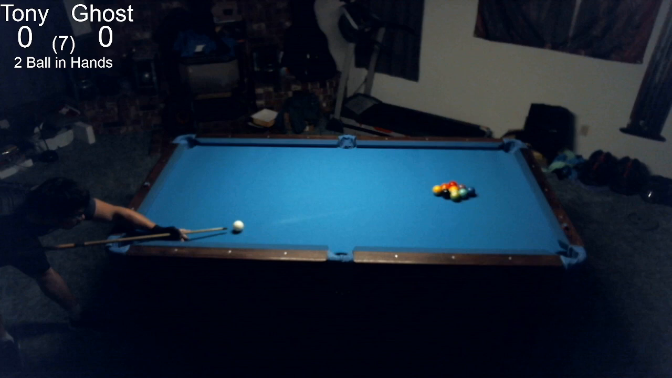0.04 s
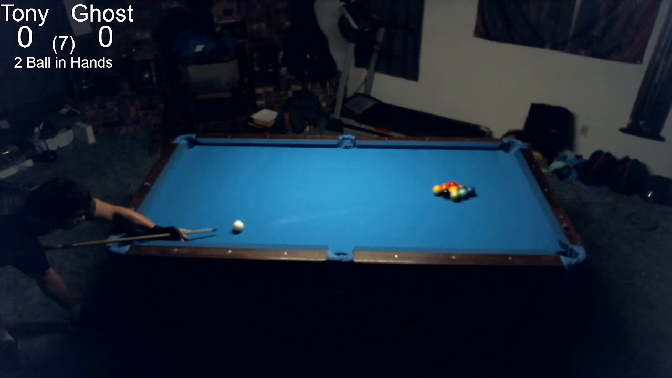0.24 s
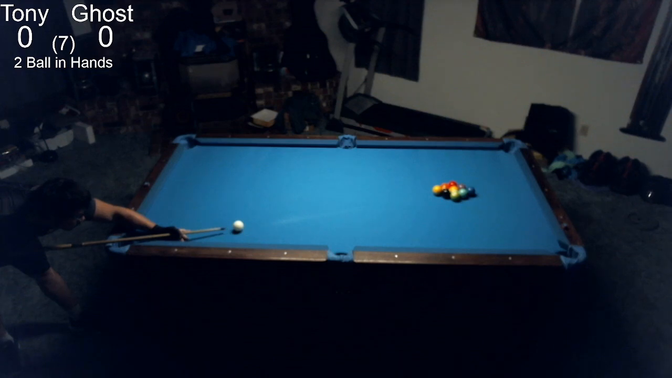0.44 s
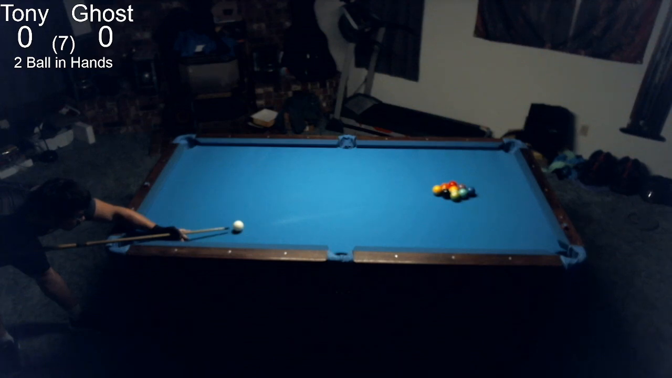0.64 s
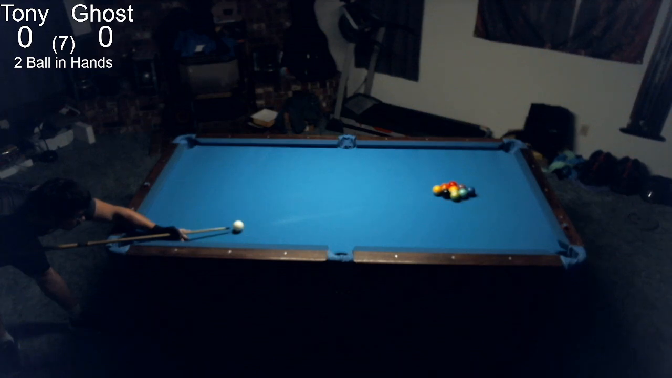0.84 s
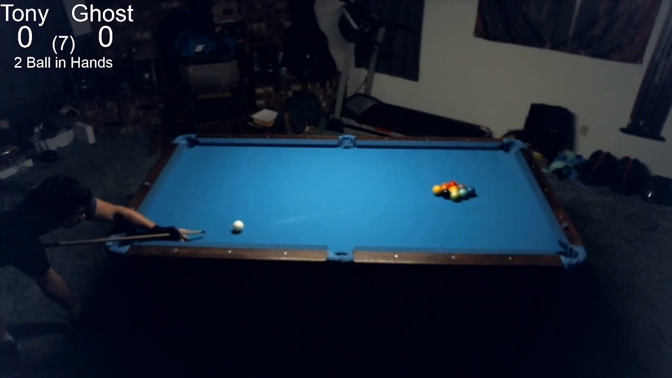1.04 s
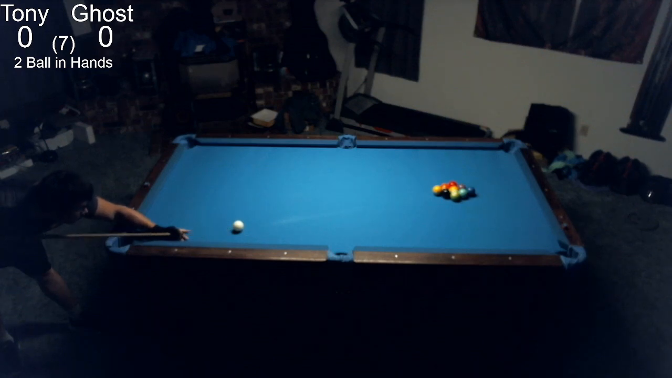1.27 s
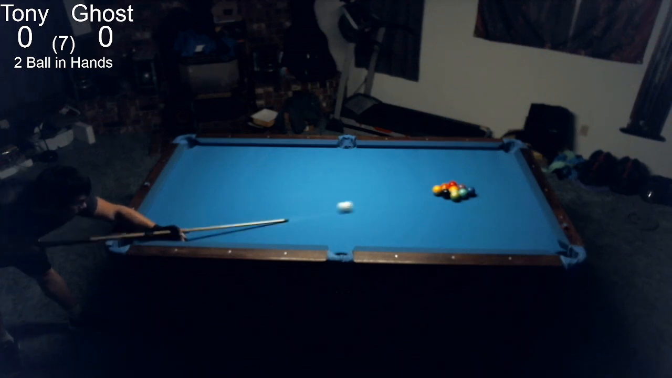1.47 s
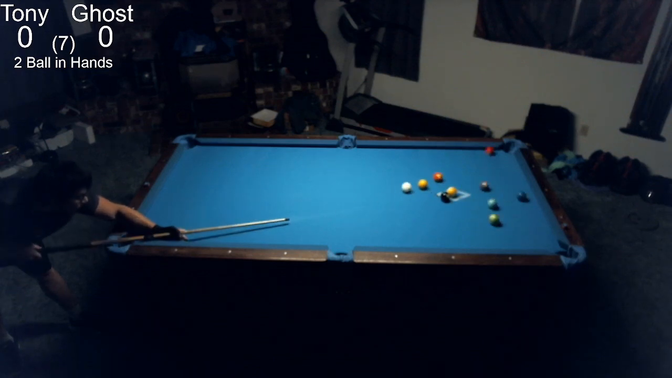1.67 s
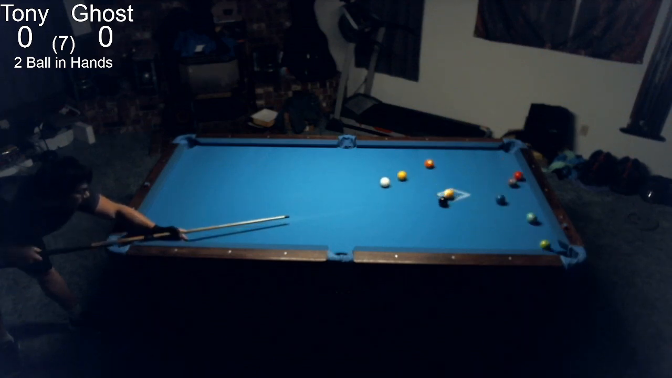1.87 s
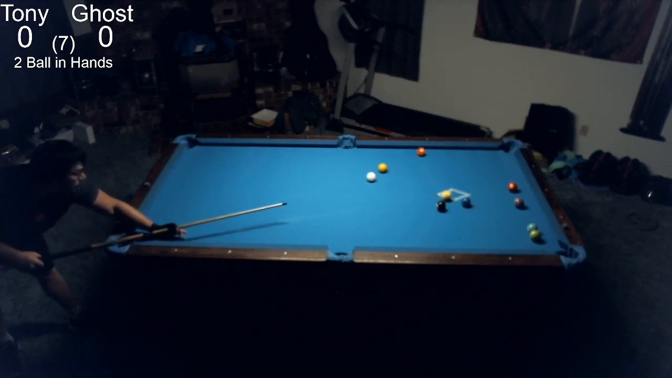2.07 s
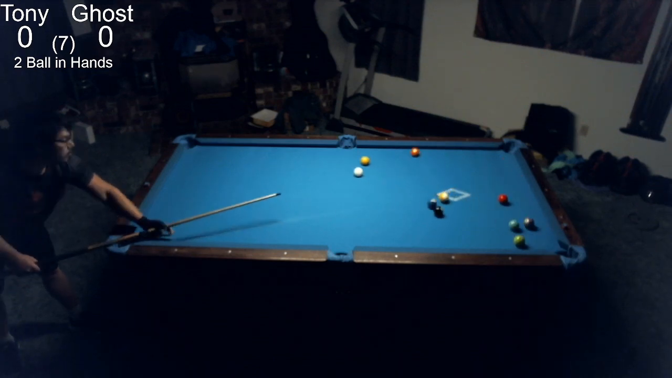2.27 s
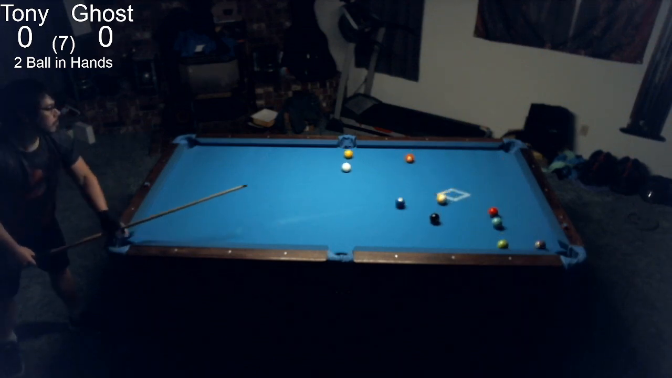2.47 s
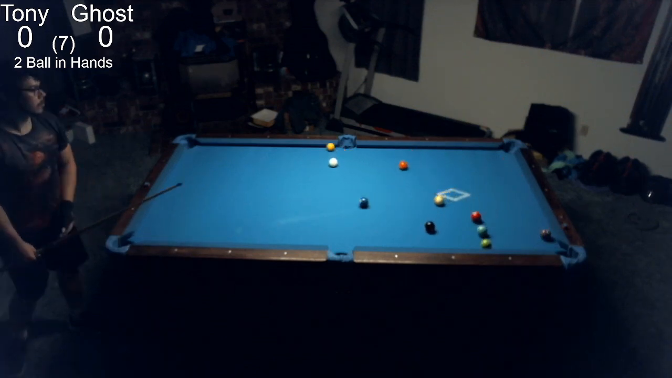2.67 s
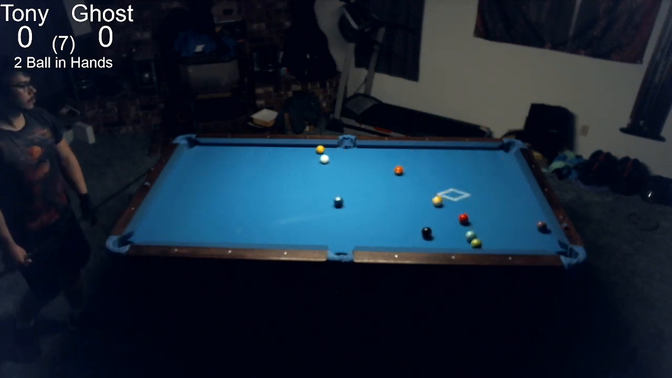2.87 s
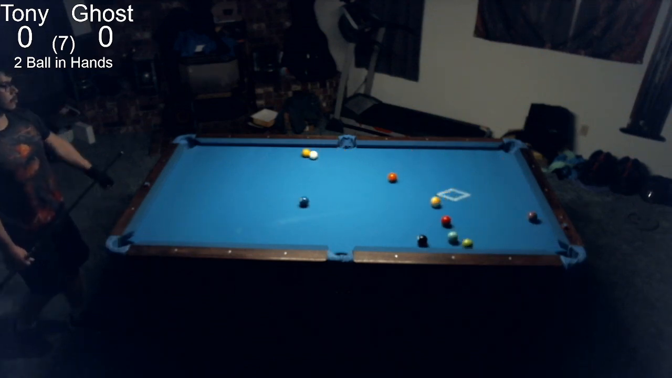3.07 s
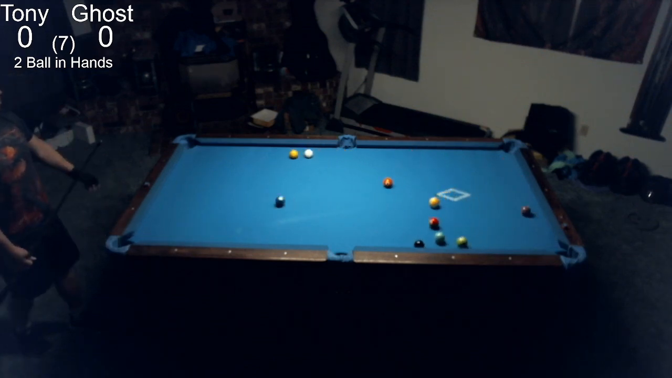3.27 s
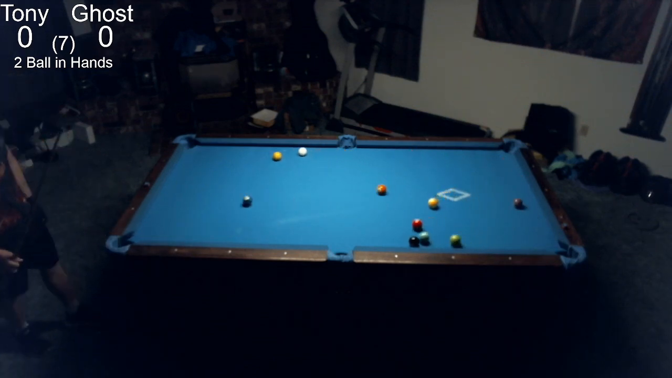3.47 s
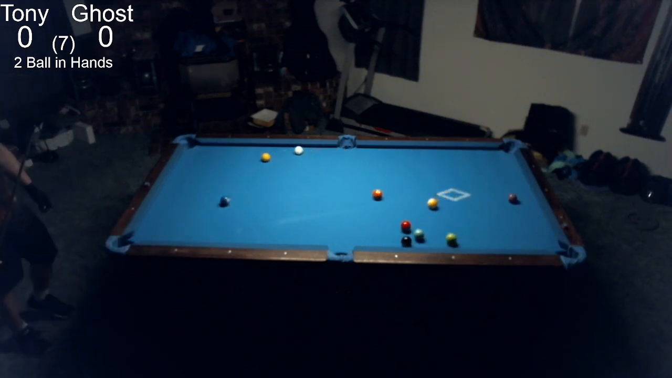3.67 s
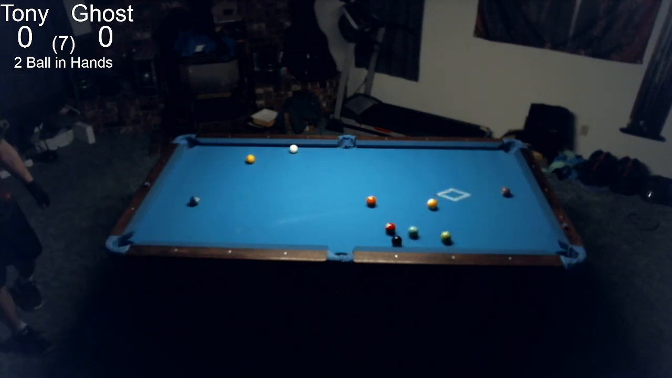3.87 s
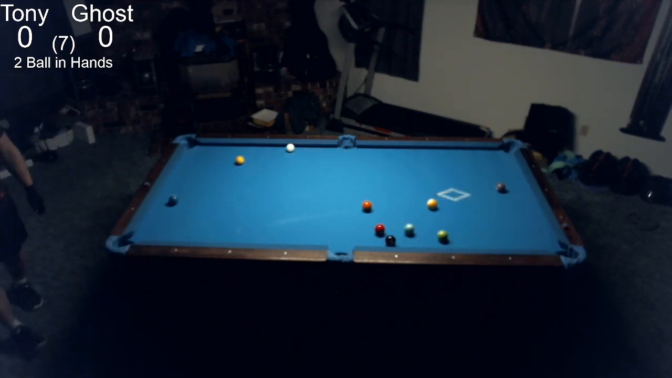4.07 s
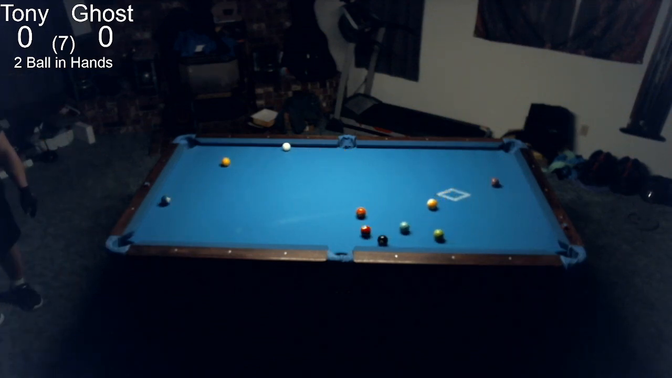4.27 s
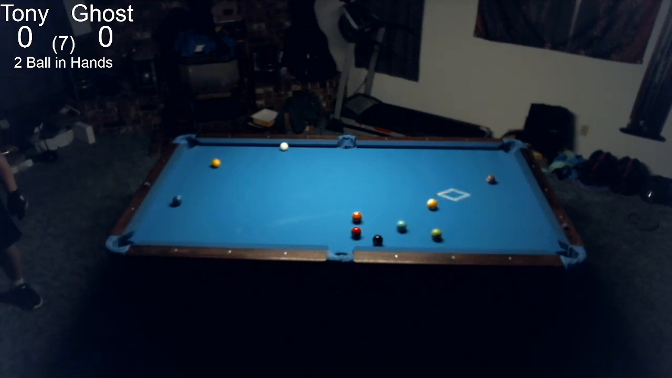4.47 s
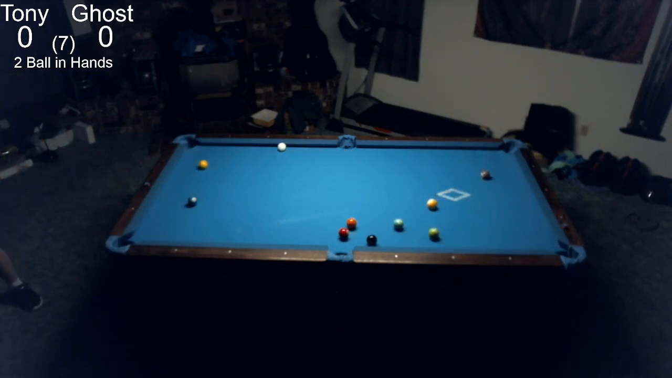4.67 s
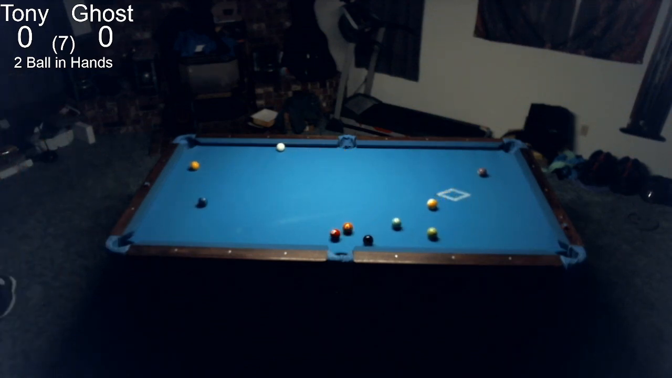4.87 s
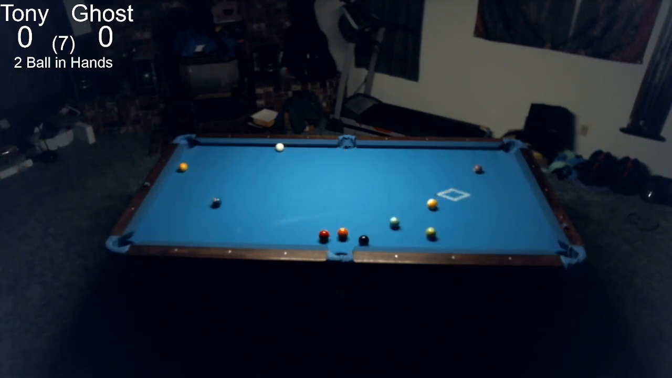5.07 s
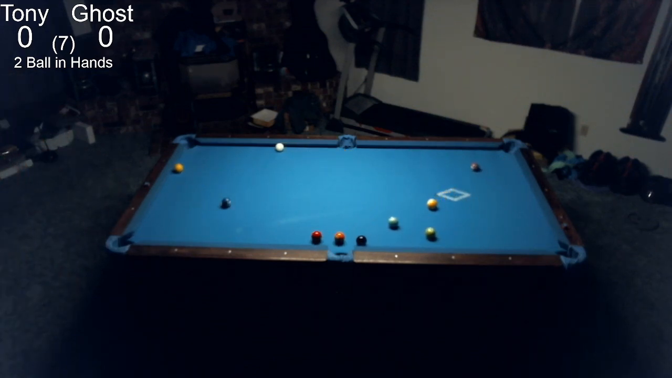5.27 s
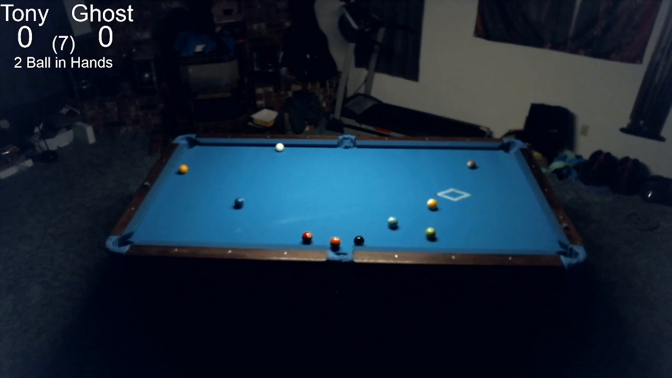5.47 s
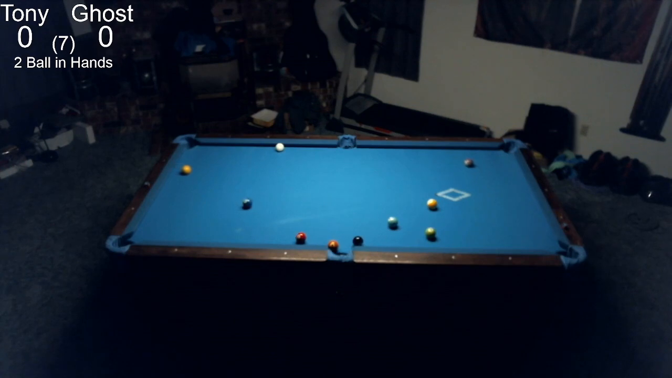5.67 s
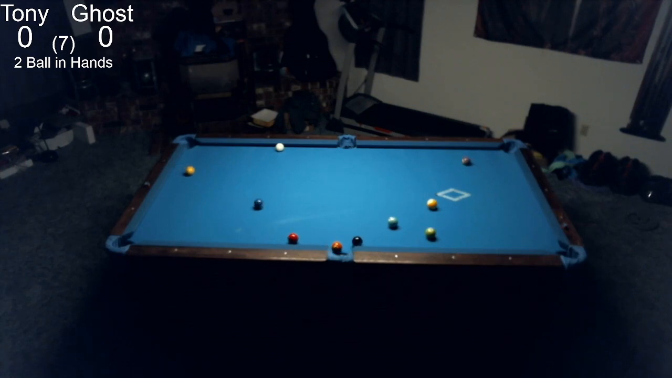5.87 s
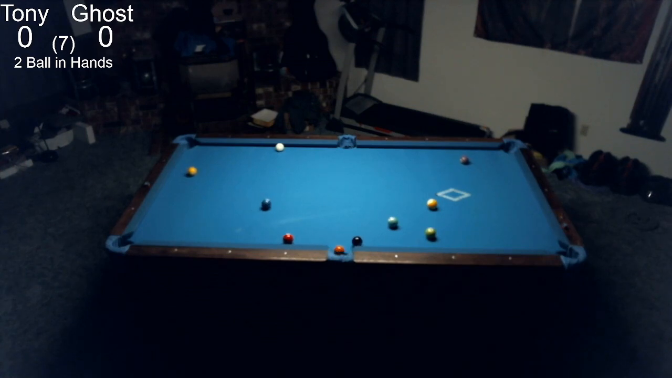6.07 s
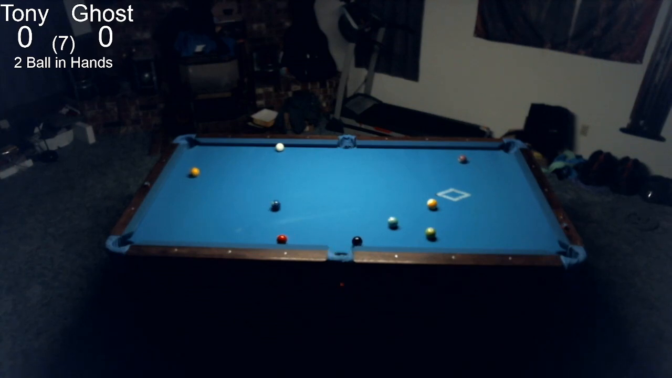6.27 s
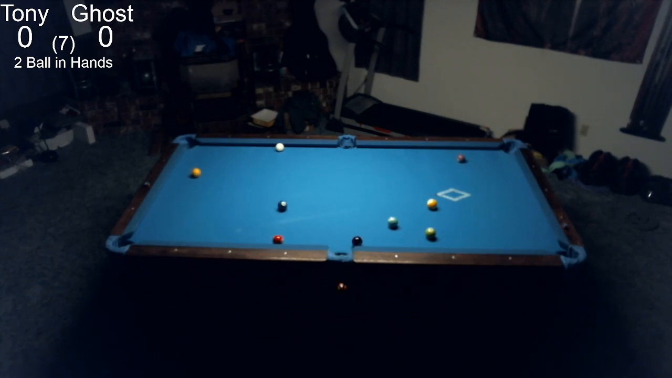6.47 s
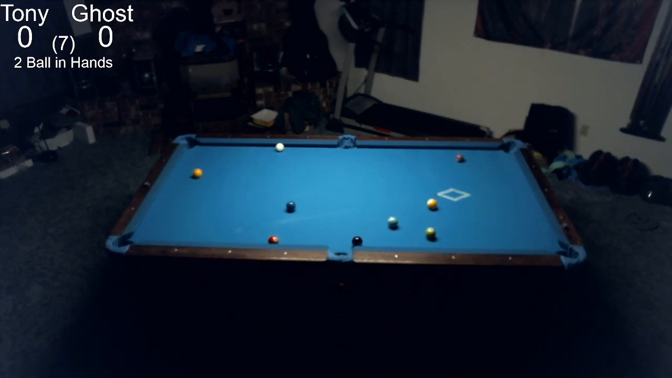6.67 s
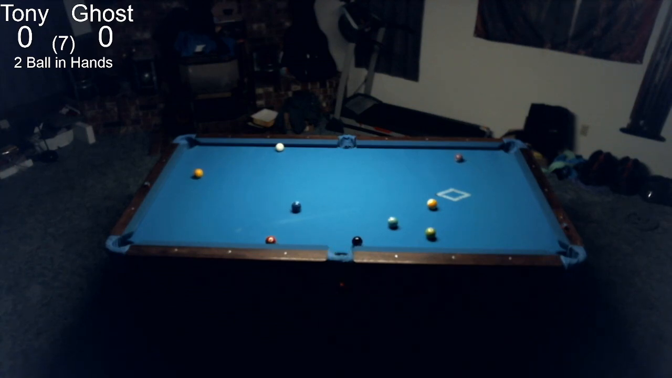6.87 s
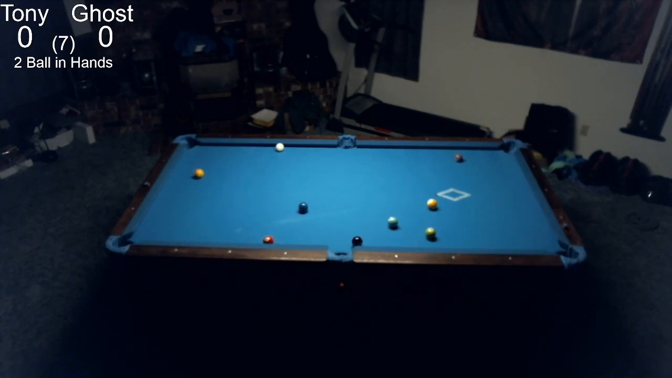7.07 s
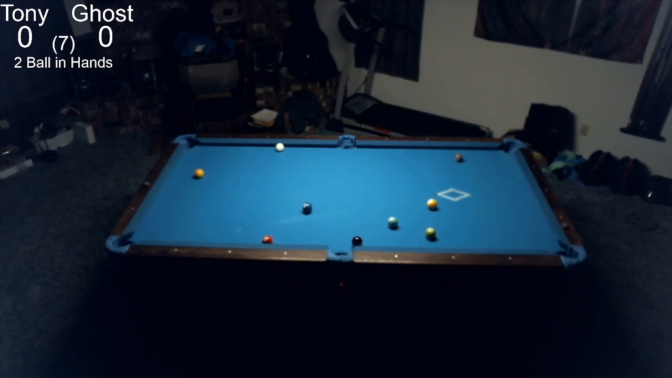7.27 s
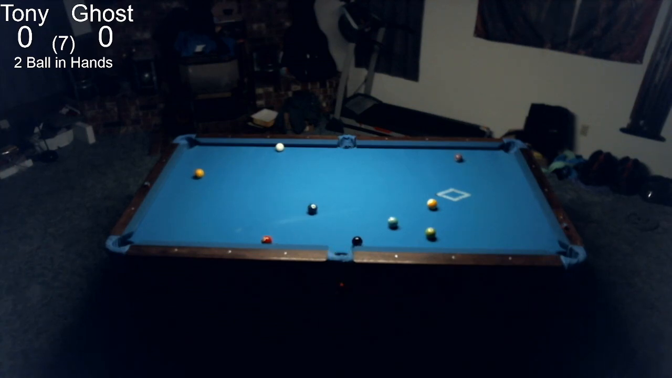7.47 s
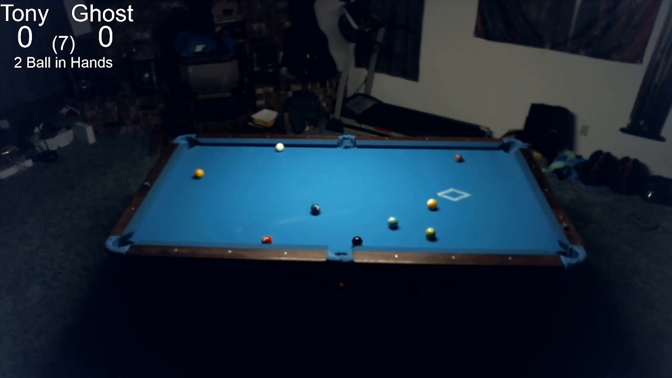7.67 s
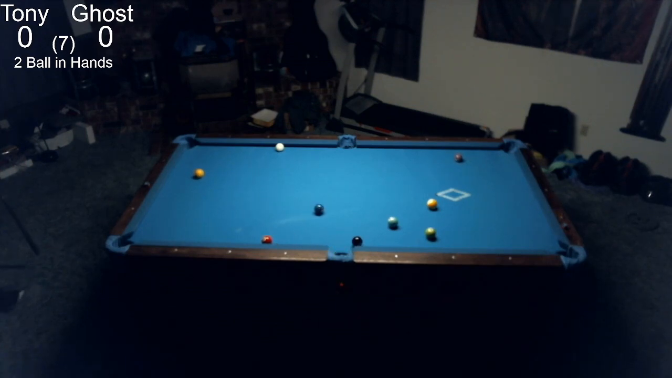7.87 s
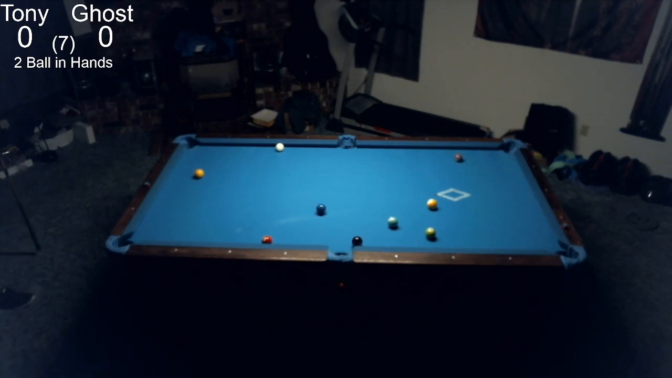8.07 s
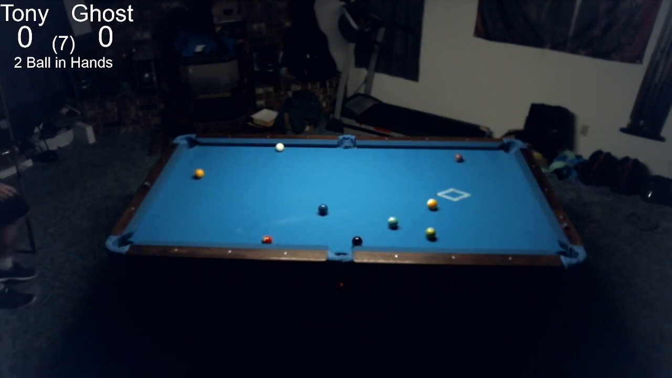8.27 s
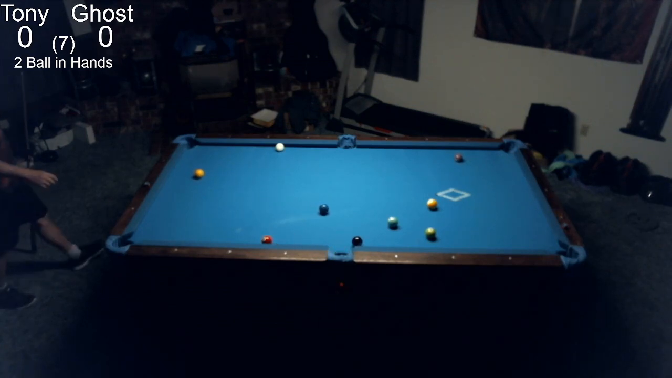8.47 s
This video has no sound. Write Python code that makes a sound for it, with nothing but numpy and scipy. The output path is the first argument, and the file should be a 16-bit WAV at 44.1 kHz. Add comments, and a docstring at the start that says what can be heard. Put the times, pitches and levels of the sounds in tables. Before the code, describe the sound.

A hard cue crack and explosive pool break overload the microphone, then ball clicks fade, with light taps and a pocketed ball knocking through the return.

```python
"""A small, quiet game room with a pool table: a nine-ball break, heard from beside the table.
The cue cracks and rings, the rack bursts in a buzzing crack that overloads the microphone and echoes off a wall,
and the balls thump the cushions and click, mostly softer as they go. Later come light taps, mostly the cue put away,
while a ball rolls onto a side pocket's lip and knocks down the return. Mains hum and a faint hiss lie under it all.
Blows are short bursts of filtered noise, force pulses or decaying tones, each given the echoes of the room."""
import sys
import numpy as np
from scipy import signal
from scipy.fft import rfft, irfft
from scipy.io import wavfile
from scipy.ndimage import uniform_filter1d, minimum_filter1d

SR = 44100
rng = np.random.default_rng(int(sys.argv[2]) if len(sys.argv) > 2 else 0)


def materialize(psi):
    """Save the field psi as 16-bit PCM at rate SR to the path in sys.argv[1].

    A 1-D psi becomes a single channel; in a 2-D psi each row is a channel.
    """
    bounded = np.clip(np.atleast_2d(psi).T, -1, 1)
    quanta = np.round(bounded * 32767).astype(np.int16)
    wavfile.write(sys.argv[1], SR, quanta)


N = 375732  # samples in the whole scene
LENGTH = 32768  # samples in one blow with its echoes
T = np.arange(LENGTH) / SR  # time within a blow, s
HZ = np.fft.rfftfreq(LENGTH, 1 / SR)


def amp(db):
    """Turns decibels into a gain."""
    return 10 ** (np.asarray(db) / 20)


def unit(x):
    """Scales a sound to energy 1."""
    return x / np.sqrt(np.sum(x ** 2) + 1e-20)


def read_curve(points, hz):
    """Joins (frequency, value) points by straight lines on a log-frequency axis."""
    point_hz, value = np.transpose(points)
    return np.interp(np.log(hz + 1), np.log(point_hz + 1), value)


def add(mix, start_s, sound):
    """Mixes a sound in at its start time, cut off at the end of the mix."""
    part = mix[round(start_s * SR):][:len(sound)]
    part += sound[:len(part)]


def colour(x, gain_db):
    """Filters with the given gain at each frequency, without sounding before the blow."""
    both_sides_db = np.r_[gain_db, gain_db[-2:0:-1]]
    log_gain = np.log(amp(both_sides_db))
    # the Hilbert transform gives the phase that makes the filter start at once (minimum phase)
    response = np.exp(np.conj(signal.hilbert(log_gain)))[:len(HZ)]
    return irfft(rfft(x) * response)


def echo(x, delay_ms):
    """Plays the same sound later."""
    return np.interp(T - delay_ms / 1000, T, x, left=0)


def decay(t60):
    """Dies away by 60 dB in t60 seconds."""
    return amp(-60 * T / t60)


def ring(modes):
    """A struck body sounds as a sum of dying tones, one for each way it can vibrate."""
    total = 0
    for pitch_hz, level_db, t60_s in modes:
        tone = decay(t60_s) * np.cos(2 * np.pi * pitch_hz * T)
        total = total + amp(level_db) * unit(tone)
    return total


def rattle(t60, snap):
    """One sharp contact, then dying chatter; snap is the contact's size against the chatter."""
    chatter = unit(rng.standard_normal(LENGTH) * decay(t60))
    chatter[0] += snap
    return unit(chatter)


# First echoes off the walls: delay_ms, level_db
WALL_ECHOES = [(11.6, -13), (14.2, -14), (16.2, -11.5), (20.2, -9.5)]
# How long the room rings at each pitch: frequency_hz, t60_s
ROOM_DECAY = [(120, 0.28), (400, 0.67), (900, 0.4403), (1500, 0.34), (2500, 0.3), (4500, .32), (7000, 0.27)]


def room(x, room_db, walls_db=-2, build_s=.012, early=0.98):
    """Direct sound, first wall echoes and a diffuse tail whose decay time depends on frequency."""
    hz, t, noise = signal.stft(rng.standard_normal(LENGTH), SR, nperseg=256)
    t60 = read_curve(ROOM_DECAY, hz)[:, None]
    tail = signal.istft(noise * amp(-60 * t / t60), SR, nperseg=256)[1][:LENGTH]
    tail = unit(tail * np.where(T < build_s, early, 1))  # early is the gain until build_s
    wet = unit(signal.fftconvolve(x, tail)[:LENGTH])
    for delay_ms, level_db in WALL_ECHOES:
        wet = wet + amp(level_db + walls_db) * echo(unit(x), delay_ms)
    return x + amp(room_db) * np.linalg.norm(x) * unit(wet)


# Mains hum, one row for each steady tone: pitch_hz, level_db (rms)
HUM_TONES = [(59.95, -69), (119.9, -91), (307, -94), (419.7, -94), (539.6, -92.5), (659.5, -93)]
# Tone colour of the hiss: frequency_hz, level_db (per Hz, relative)
HISS_COLOUR = [(20, -13.5), (100, -10.5), (160, -3.5), (290, -1), (500, -7), (790, -5), (1300, -8.5),
               (2000, -11), (3200, -13.5), (5200, -12.5), (6300, -16), (7000, -24), (7600, -29)]


def background(hiss_db=-81.5):
    """Mains hum is a few steady sine tones; the room's faint hiss is steady filtered noise."""
    t = np.arange(N) / SR
    hum = np.zeros(N)
    for pitch_hz, level_db in HUM_TONES:
        hum += amp(level_db) * np.sqrt(2) * np.sin(2 * np.pi * (pitch_hz * t + rng.random()))
    gain = amp(read_curve(HISS_COLOUR, np.fft.rfftfreq(N, 1 / SR)))
    hiss = irfft(rfft(rng.standard_normal(N)) * gain, N)
    return hum + amp(hiss_db) * hiss / hiss.std()


# The cue's blow, a few contacts in quick succession: start_s, level_db (energy)
STROKE_CONTACTS = [(1.4130, 3.5), (1.4145, 3.5), (1.4181, 5.5)]
# Tone colour of the crack: frequency_hz, gain_db
CRACK_COLOUR = [(50, -55), (130, -33), (220, -12), (450, -5.5), (1100, -1.5), (1500, -3), (2000, -6.5),
                (2500, 2), (3900, 2), (5200, 0.5), (6200, -9), (7000, -13.5), (7500, -27)]
# The ringing cue: pitch_hz, level_db (energy), t60_s
SHAFT_MODES = [(1718.3, -4, 0.1399), (2600, -11.5, 0.08059), (2829, -8.5, 0.3), (2920, -1, 0.27),
               (3814, -14.5, .15), (4310, -11.5, .12), (4510, -3.5, .26), (4480, -7.5, 0.25),
               (4604, -9, .27), (5474, -13, .26), (5530, -9, .32), (5737, -10.5, .24)]


def cue_stroke(crack_t60=.018, snap=.15, room_db=-2.5, ring_db=3.0, ring_room_db=-1, ring_rise_s=0.0014):
    """The hard tip cracks on the cue ball and sets the shaft ringing."""
    out = np.zeros(N)
    for start_s, level_db in STROKE_CONTACTS:
        crack = unit(colour(rattle(crack_t60, snap), read_curve(CRACK_COLOUR, HZ)))
        add(out, start_s, amp(level_db) * room(crack, room_db))
    shaft = ring(SHAFT_MODES) * (1 - np.exp(-T / ring_rise_s))
    add(out, STROKE_CONTACTS[0][0], amp(ring_db) * room(shaft, ring_room_db, walls_db=-15.5))
    return out


# Dull blows of balls on slate, cushions and pocket: start_s, level_db (energy), pitch_hz
THUMP_BLOWS = [(1.498, -19.5, 469.7), (1.597, -22.5, 210), (1.6728, -12, 439), (1.702, -24, 229),
               (1.734, -24.5, 128), (1.745, -23.5, 285), (1.846, -42, 256), (1.9, -32, 193),
               (6.095, -32, 310), (6.318, -37.5, 225)]


def thumps(t60=.034, room_db=-2, rise_s=0.00069, count=3, rebound_s=.023, rebound_db=-9.5, rebound_pitch=0.75):
    """Soft blows make the table's body sound briefly; each rebound is later, weaker and lower."""
    out = np.zeros(N)
    for start_s, level_db, pitch_hz in THUMP_BLOWS:
        for k in range(count):
            tone = ring([(pitch_hz * rebound_pitch ** k, 0, t60)])
            blow = unit(tone * (1 - np.exp(-T / rise_s)))
            add(out, start_s + k * rebound_s, amp(level_db + k * rebound_db) * room(blow, room_db))
    return out


# Tone colour of a ball struck by a ball: frequency_hz, gain_db
CLICK_COLOUR = [(60, -41), (200, -30.5), (550, -23.5), (800, -9), (1100, -1.5), (1700, 3), (2500, 6),
                (3300, -2), (4000, -10), (4600, -14.5), (5600, -15.5), (6500, -23), (7500, -34)]


def contact(strength_db, touch_ms=.305, law=.165):
    """Two balls squeeze and part, radiating the change of force; softer hits touch longer and sound duller."""
    # touch_ms is for a 0 dB collision; it shrinks as strength to the power law
    ms = touch_ms * amp(-law * strength_db)
    force = np.sin(np.pi * np.minimum(T * 1000 / ms, 1)).clip(0) ** 1.5
    return unit(colour(np.diff(force, prepend=0), read_curve(CLICK_COLOUR, HZ)))


# The rack's two bursts, then their echoes off the far wall about 22 ms later: start_s, level_db (energy)
RACK_BURSTS = [(1.5672, 17), (1.5711, 15), (1.5890, -0.5), (1.5930, 5)]


def rack(share_db=-5, hop_ms=.355, jitter=0.11, hop_gain_db=1.43, chain_db=1.5, chain_room_db=-14,
         spray_db=-3, spray_t60=.01, spray_room_db=0.1, count=9):
    """A burst is a buzz of growing clicks, the shock hopping from ball to ball, with a spray of loose contacts.

    The far wall's echoes of the two bursts are made the same way, only weaker."""
    out = np.zeros(N)
    for start_s, level_db in RACK_BURSTS:
        click = contact(level_db + share_db)
        hops = hop_ms * (np.arange(count) + jitter * rng.standard_normal(count))
        chain = unit(sum(amp(hop_gain_db * k) * echo(click, ms) for k, ms in enumerate(hops)))
        spray = unit(signal.fftconvolve(rattle(spray_t60, .5), click)[:LENGTH])
        # the rack stands clear of the walls, so the room answers late
        for sound, part_db, wet_db in [(chain, chain_db, chain_room_db), (spray, spray_db, spray_room_db)]:
            heard = room(sound, wet_db, walls_db=-3.5, build_s=0.013, early=0.4)
            add(out, start_s, amp(level_db + part_db) * heard)
    return out


# Tone colour of the slate and frame: frequency_hz, gain_db
SLATE_COLOUR = [(100, -28.5), (220, -14), (450, -7), (750, -1.5), (1050, 3), (1400, 1), (2200, -16.5),
                (5000, -49)]


def table(level_db=-2.0, t60=0.38, room_db=0):
    """The scattering balls skip and chatter on the slate: one long, dull rattle of the table."""
    out = np.zeros(N)
    chatter = unit(colour(rattle(t60, 0), read_curve(SLATE_COLOUR, HZ)))
    add(out, RACK_BURSTS[0][0], amp(level_db) * room(chatter, room_db))
    return out


def jostle(level_db=-3, after_s=0.027, spread_s=.1, fall_db_per_s=170, scatter_db=3, hard_db=12,
           room_db=-3, count=8):
    """Balls leaving the rack clip one another: separate hard clacks, thinning out and weakening."""
    out = np.zeros(N)
    for k, (when, size) in enumerate(rng.random((count, 2))):
        late_s = spread_s * ((k + when) / count) ** 1.5
        strength_db = scatter_db * (2 * size - 1) - fall_db_per_s * late_s
        clack = room(contact(hard_db + strength_db), room_db)
        add(out, RACK_BURSTS[0][0] + after_s + late_s, amp(level_db + strength_db) * clack)
    return out


# Ball on ball: start_s, level_db (energy sent into the room), aimed_db (share aimed at the microphone),
# ceiling_ms (delay of the ceiling echo)
BALL_CLICKS = [(1.9152, -1.5, -4, 2.5), (2.0989, -15.5, -4.5, 4.4), (2.1086, -19.5, 2.5, 3.85),
               (2.2394, -27.5, -6, 2.9), (2.5557, -12.5, -12, 3.8), (2.8589, -19.5, -13.5, 4.0),
               (3.1068, -27.5, -6, 3.38), (3.1333, -38, -1, 3.6), (3.4992, -22, -3, 4)]


def clicks(near_ms=1.876, near_db=-4, ceiling_db=0, walls_db=-7, sideways=0.58):
    """A collision beams along its line of impact; the more it is turned away, the harder it hits the walls."""
    out = np.zeros(N)
    for start_s, level_db, aimed_db, ceiling_ms in BALL_CLICKS:
        click = contact(level_db)
        # the aimed share also arrives off a near surface and off the low ceiling
        near = amp(near_db) * echo(click, near_ms)
        ceiling = amp(ceiling_db) * echo(click, ceiling_ms)
        heard = room(click, -aimed_db, walls_db - sideways * aimed_db, build_s=.012, early=.7)
        add(out, start_s, amp(level_db + aimed_db) * (heard + near + ceiling))
    return out


def knock(spectrum, tilt_db, t60, snap):
    """A short rattle takes on a body's colour, tilted brighter or duller above 800 Hz."""
    octaves = np.log2(np.maximum(HZ, 800) / 800)
    return unit(colour(rattle(t60, snap), read_curve(spectrum, HZ) + tilt_db * octaves))


# Light taps, mostly the cue put away; the one at 5.916 s is the ball at the pocket's lip:
# start_s, level_db (energy), tilt_db (brightness per octave), ring_db
TAP_BLOWS = [(4.747, -48.5, -6, -9), (5.217, -34.5, -6, -15), (5.225, -35, 1.5, -25), (5.916, -49, -3, -24),
             (6.2816, -17.5, 3, -7), (6.441, -42.5, 2, -22), (6.4835, -27.5, 4, -3.5),
             (6.545, -41, -1.5, -3.5)]
# Tone colour of the taps: frequency_hz, gain_db
LIGHT_COLOUR = [(250, -34.5), (650, -14.5), (1000, 0), (1700, 1), (2300, 2), (3500, 6), (4500, -2),
                (5500, 5), (6400, 0), (7100, -22.5)]
# Their brief ring: pitch_hz, level_db (energy), t60_s
TAP_RING = [(2424, -2.5, 0.021), (2650, 2.5, 0.02), (3468, -10, 0.021), (5390, -4.5, 0.029),
            (5688, -13, 0.025)]


def light_taps(t60=0.07, snap=0.48, room_db=6.0):
    """Each light tap is a short rattle with a brief ring; strong echoes make it sound farther off."""
    out = np.zeros(N)
    for start_s, level_db, tilt_db, ring_db in TAP_BLOWS:
        tap = knock(LIGHT_COLOUR, tilt_db, t60, snap) + amp(ring_db) * ring(TAP_RING)
        add(out, start_s, amp(level_db) * room(tap, room_db))
    return out


# Tiny ticks of the cue's hard fittings: start_s, level_db (energy)
FITTING_TICKS = [(5.2335, -28), (5.290, -34.5), (5.2959, -34)]


def ticks(tilt_db=4, t60=0.0083, snap=0.2, room_db=-4):
    """Sharp contacts on the cue, whose chatter dies almost at once."""
    out = np.zeros(N)
    for start_s, level_db in FITTING_TICKS:
        tick = knock(LIGHT_COLOUR, tilt_db, t60, snap)
        add(out, start_s, amp(level_db) * room(tick, room_db))
    return out


# The ball rolls onto the pocket's lip (5.951 s), then knocks down the return:
# start_s, level_db (energy), tilt_db (brightness per octave)
POCKET_KNOCKS = [(5.951, -46.5, -19), (6.0945, -25.5, 4), (6.102, -32.5, -13), (6.171, -40, 6),
                 (6.205, -37, -3), (6.616, -34.5, -12.5), (6.7275, -13, 1.5), (6.8888, -33, -2.5)]
# Tone colour of the pocket and return: frequency_hz, gain_db
RETURN_COLOUR = [(100, -46), (250, -12.5), (600, -28.5), (900, -6), (1300, 3.5), (2000, 4.5), (2800, 4.5),
                 (4100, -2.5), (4700, -9.5), (6000, -9), (7000, -31)]


def pocket(t60=0.034, snap=.5, room_db=-5):
    """The ball raps the near side of the table at the pocket and inside: short, dry clacks with little echo."""
    out = np.zeros(N)
    for start_s, level_db, tilt_db in POCKET_KNOCKS:
        clack = knock(RETURN_COLOUR, tilt_db, t60, snap)
        add(out, start_s, amp(level_db) * room(clack, room_db, walls_db=-13))
    return out


def scene(low_cut_hz=95):
    """All the blows, with their bass cut as by a small microphone, over the hum and hiss."""
    hits = cue_stroke() + thumps() + rack() + table() + jostle()
    hits += clicks() + light_taps() + ticks() + pocket()
    low_cut = signal.butter(2, low_cut_hz, "highpass", fs=SR, output="sos")
    mix = signal.sosfilt(low_cut, hits) + background()
    return mix[None]


def record(dry, limit=1.35, hold_s=.0008, ceiling=.85, edge_hz=7220):
    """A fast limiter tames the loudest peaks, the rest saturates softly, then the top treble is cut."""
    hold = round(hold_s * SR) | 1  # an odd number of samples
    gain = limit / np.maximum(abs(dry), limit)
    held = dry * uniform_filter1d(minimum_filter1d(gain, hold), hold)
    squashed = held / (1 + (held / ceiling) ** 6) ** (1 / 6)
    band_limit = signal.firwin(161, edge_hz, window=("kaiser", 8), fs=SR)
    return signal.oaconvolve(squashed, band_limit[None], "same")


dry = scene()
out = record(dry)
materialize(out)
```